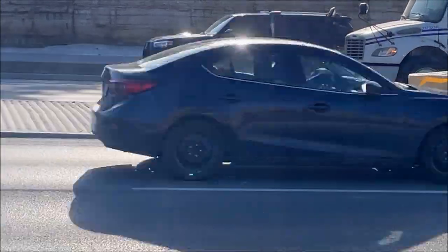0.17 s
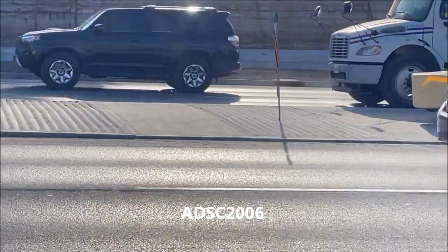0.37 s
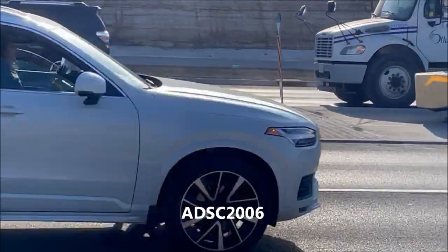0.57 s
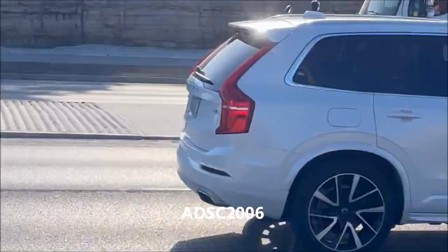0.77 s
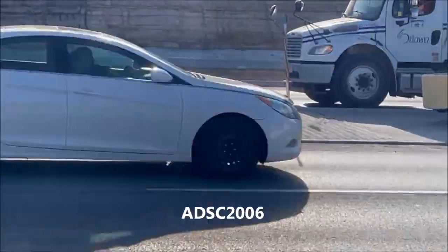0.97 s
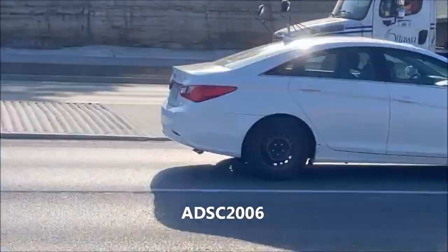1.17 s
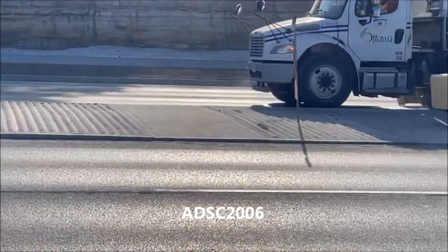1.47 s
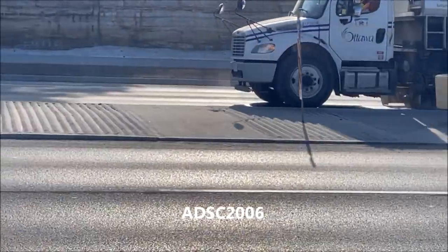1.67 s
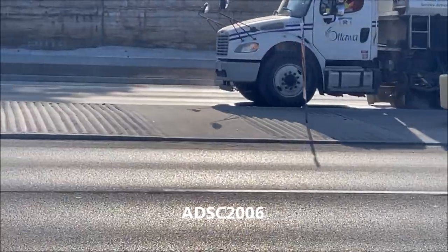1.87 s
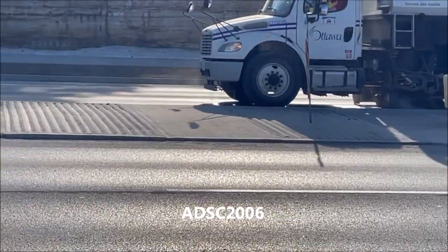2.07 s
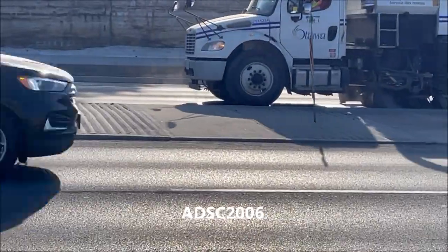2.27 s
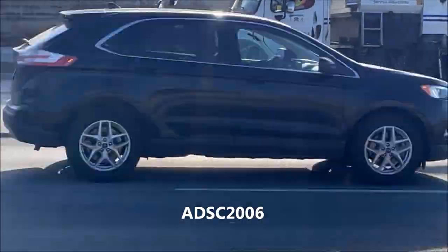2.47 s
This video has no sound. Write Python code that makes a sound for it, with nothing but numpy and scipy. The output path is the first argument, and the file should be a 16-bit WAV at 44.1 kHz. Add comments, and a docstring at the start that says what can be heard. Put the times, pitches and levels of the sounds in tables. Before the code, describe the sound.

Busy road traffic roars past close by, tyres hissing on asphalt over low engine rumble

```python
"""After a brief silence the roar and rumble of a busy multi-lane road cut in, heard from the verge.
Tyres on asphalt give bands of shaped noise from 1 kHz into the treble; hiss swells as cars go by.
Engines give low noise and fuzzy harmonic lines: a slow truck whose pitch dips and then climbs,
and a steady idle. Short Gaussian throbs dot the bass, and a faint hum enters late.
Two microphone ports hear the noise with a likeness and phase lead that depend on frequency."""
import sys
import numpy as np
from scipy import signal
from scipy.io import wavfile
from scipy.ndimage import uniform_filter1d

SR = 44100
rng = np.random.default_rng(int(sys.argv[2]) if len(sys.argv) > 2 else 0)


def int16_out(signal):
    """Quantize to a 16-bit WAV file."""
    q = np.round(np.clip(np.atleast_2d(signal).T, -1, 1) * 32767)
    wavfile.write(sys.argv[1], SR, q.astype(np.int16))


N = 115983

# Tyre roar near 1 kHz: [t/s, level/dB, left minus right/dB], and its spectrum [f/Hz, level/dB]
ROAR_LEVEL = [(.18, -25.5, 0.5), (.35, -24, 0.5), (.65, -22.5, -0.5), (.9, -22.5, -2), (1.15, -23.5, -3),
              (1.33, -24.5, -3), (1.55, -27, -5.5), (1.75, -28.5, -4.5), (1.95, -27, -4.5), (2.25, -28, -2),
              (2.62, -26, -3)]
ROAR_SPECTRUM = [(200, -18.5), (400, -10), (620, -4), (800, -1.5), (960, 0), (1150, -4.5), (1400, -8),
                 (1650, -19), (2600, -34), (5000, -55)]
# Upper tyre band, about 1.7 to 3.2 kHz: [t/s, level/dB], spectrum [f/Hz, level/dB]
WHINE_LEVEL = [(.18, -32.5), (.45, -31.5), (.6, -30.5), (.8, -30), (1.0, -32), (1.25, -33.5), (1.55, -31),
               (1.8, -35), (2.05, -32), (2.3, -35), (2.45, -32.5), (2.62, -35.5)]
WHINE_SPECTRUM = [(1200, -49), (1750, -8), (2000, -12), (2300, -0.5), (2550, 0), (2900, 0), (3250, -7),
                  (4500, -23), (8000, -66)]
# Band reaching the ports almost in antiphase: [t/s, level/dB, left minus right/dB], [f/Hz, level/dB]
WIDE_LEVEL = [(.18, -26.5, -2), (.4, -26.5, -0.5), (.8, -29.5, -4), (1.2, -26, -2.5), (1.5, -26, 1.5),
              (1.8, -26.5, -1), (2.1, -25.5, -1), (2.4, -28, -2.5)]
WIDE_SPECTRUM = [(700, -11.5), (1150, -10), (1400, -4), (1650, 2.5), (1900, -4), (2200, -6), (2600, -19.5),
                 (4000, -74)]
# Tyres of the near-lane cars, near 2 kHz: [t/s, level/dB], spectrum [f/Hz, level/dB]
SING_LEVEL = [(.18, -33.5), (.4, -36), (.55, -28.5), (.66, -32), (.76, -28.5), (.85, -31), (.95, -29),
              (1.02, -30), (1.1, -31.5), (1.35, -38), (1.9, -36.5), (2.15, -34.5), (2.28, -30.5),
              (2.45, -34.5), (2.62, -32)]
SING_SPECTRUM = [(1200, -60), (1700, -9), (1870, 3), (2050, 2), (2250, -1.5), (2450, -29), (3500, -52)]
# Tyres of the first car, near 1.4 kHz: [t/s, level/dB], spectrum [f/Hz, level/dB]
DRONE_LEVEL = [(.18, -35.5), (.3, -32), (.55, -34), (.72, -43), (1.1, -33), (1.6, -36.5), (2.0, -37)]
DRONE_SPECTRUM = [(1000, -40), (1280, 0), (1450, -3), (1600, -15), (2000, -50)]
# Lower treble of the tyres: [t/s, level/dB], spectrum [f/Hz, level/dB]
FIZZ_LEVEL = [(.18, -34), (.5, -33.5), (.79, -34), (.95, -37), (1.2, -36), (1.4, -37.5), (1.85, -36.5),
              (2.07, -34), (2.17, -35), (2.27, -32), (2.48, -35), (2.62, -32.5)]
FIZZ_SPECTRUM = [(1500, -26), (2800, -14.5), (3500, -2), (5000, -5), (6500, -10), (8000, -13), (9500, -20),
                 (13000, -43)]
# Swells of high hiss: [t of the top/s, level/dB, half-width at half amplitude/s]
HISS_SWELLS = [(.27, -51.5, .2), (.46, -61, .12), (.7, -48, 0.17), (1.19, -50, 0.1), (1.6, -49, 0.11),
               (1.76, -51, .15), (2.06, -49, 0.17), (2.27, -41, .14), (2.62, -41, 0.16)]
# Spectra of the hiss and of the sheen at the very top: [f/Hz, level/dB]
HISS_SPECTRUM = [(3000, -43), (6000, 1.5), (8500, 0.5), (10500, -1.5), (12500, -5), (13700, -17),
                 (15000, -28)]
SHEEN_SPECTRUM = [(11000, -30), (13000, -10), (14200, -2), (15300, 3), (16500, -4)]
# Rumble of many engines: [t/s, level/dB], spectrum [f/Hz, level/dB]
RUMBLE_LEVEL = [(.18, -25.5), (.3, -24.5), (.7, -23), (1.0, -24), (1.2, -22), (1.5, -25), (1.75, -22),
                (2.0, -25), (2.3, -23), (2.62, -23.5)]
RUMBLE_SPECTRUM = [(15, -50), (27, -26), (36, -4.5), (48, -4), (65, -0.5), (110, -5), (200, -7),
                   (300, -12.5), (430, -21), (900, -33), (2000, -57)]
# Truck engine: [t/s, firing f/Hz, level/dB], and its orders [multiple of firing f, level/dB]
TRUCK_ENGINE = [(.18, 75.76, -40), (.66, 75.23, -42), (1.3, 74.88, -31), (1.7, 69.96, -33),
                (2.1, 79.66, -29.5), (2.3, 78.9, -33), (2.62, 91.8, -32.5)]
TRUCK_ORDERS = [(1, -2.5), (2, -4), (3, -15)]
# Low throbs that stand out of the rumble: [t/s, f/Hz, peak level/dB]
THROB_EVENTS = [(.24, 57.7, -19.5), (.93, 54, -21), (1.01, 73, -21), (1.11, 220.5, -23),
                (1.16, 116.2, -21.5), (1.4, 95, -22), (1.66, 212.8, -21), (2.15, 83, -17),
                (2.28, 78, -19.5), (2.49, 88.5, -20.5), (2.6, 92.5, -18.5)]
# Microphone ports: likeness [f/Hz, 0 to 1], and phase lead of the left one [f/Hz, rad]
PORT_LIKENESS = [(40, 0.84), (80, 0.83), (180, 0.8), (600, 0.99), (1000, 0.75), (1500, 1), (2300, 1),
                 (2700, 0.86), (5000, 0.96), (7000, 0.76), (8500, 1), (16000, 0.92)]
PORT_LEAD = [(0, 0), (1000, -.1), (1500, .5), (2000, -.2), (2400, .6), (3100, .15), (4000, .55),
             (5000, .05), (5600, .2), (6100, 1.4), (7000, .9), (8500, 3.1), (10600, 6.3), (12800, 9.4),
             (14900, 12.6), (16000, 14.0)]

WIDE_LIKENESS, WIDE_LEAD_RAD = 0.8, 2.98
HISS_FLOOR_DB = -58.5
SHEEN_DB, SHEEN_EXPONENT = -3.5, 1.14  # top level relative to the hiss maximum; deeper swells
TRUCK_WIDTH_HZ = 16  # linewidth
IDLE_HZ, IDLE_DB, IDLE_WIDTH_HZ = 55.3, -37.5, 9.0
THROB_S = 0.022  # from the peak to 1/e of it
HUM_HZ, HUM_DB, HUM_WIDTH_HZ = 316, -39.692, 9.1
HUM_FROM_S, HUM_RISE_S = 1.49, 0.3
START_S, FADE_IN_S = .1693, .0006
LOW_CUT_HZ, BAND_LIMIT_HZ = 37, 15780


def amp(db):
    """Decibel law: 20 dB is a factor of ten in amplitude."""
    return 10 ** (np.asarray(db) / 20)


def evened(x):
    """Normalisation to unit root-mean-square value."""
    return x / np.sqrt(np.mean(x ** 2) + 1e-20)


def read(points, hz):
    """Linear interpolation of a spectrum table on a log-frequency axis."""
    f, value = np.transpose(points)
    return np.interp(np.log(hz + 1), np.log(f + 1), value)


def follow(rows, col=1):
    """Linear interpolation in time: one column of a table at every sample."""
    rows = np.array(rows)
    return np.interp(np.arange(N) / SR, rows[:, 0], rows[:, col])


def placed(rows):
    """Intensity stereo: left and right gains from a table of level and balance."""
    half_balance_db = follow(rows, col=2) / 2
    return amp(follow(rows) + np.array([half_balance_db, -half_balance_db]))


def noise(spectrum, patchy_db, flicker_db, size=1024, ports=None):
    """Spectral synthesis of partly coherent stereo noise, with level patches and a flicker (dB rms)."""
    hop = size // 4
    frames, hz = N // hop + 5, np.fft.rfftfreq(size, 1 / SR)
    a, b, c, d, patches = rng.standard_normal((frames, len(hz), 5)).T

    # Patches drift over bins and frames; the flicker is shared by all bins.
    patches = uniform_filter1d(patches, size=9, axis=0)
    patches = evened(uniform_filter1d(patches, size=12, axis=1))
    flicker = evened(uniform_filter1d(rng.standard_normal(frames), size=4))
    level_db = read(spectrum, hz)[:, None] + patchy_db * patches + flicker_db * flicker

    if ports is None:
        likeness = read(PORT_LIKENESS, hz)[:, None]
        lead = np.interp(hz, *np.transpose(PORT_LEAD))[:, None]
    else:
        likeness, lead = ports
    likeness = np.clip(likeness, 0, 1)

    # The left port hears a phase-shifted share of the right one plus independent noise.
    right = a + 1j * b
    shared = likeness * right * np.exp(1j * lead)
    left = shared + np.sqrt(1 - likeness ** 2) * (c + 1j * d)
    bins = np.array([left, right]) * amp(level_db)
    sound = signal.istft(bins, nperseg=size, noverlap=size - hop)[1]
    return evened(sound[:, :N])


def wavering(hz, width_hz):
    """Narrow-band modulation: slow complex noise with a steady part broadens a spectral line."""
    pole = np.exp(-np.pi * width_hz / SR)
    slow = signal.lfilter([1], [1, -pole], rng.standard_normal((2, N)))
    envelope = evened(slow[0]) + 1j * evened(slow[1]) + 2.04
    carrier = np.exp(2j * np.pi * np.cumsum(hz) / SR)
    return evened((envelope * carrier).real)


def tyres():
    """Broadband friction and impact: tread on asphalt as noise bands, the roar leaning rightward."""
    roar = noise(ROAR_SPECTRUM, 0.75, 0.21) * placed(ROAR_LEVEL)
    whine = noise(WHINE_SPECTRUM, 1.0, 0.96) * amp(follow(WHINE_LEVEL))
    wide_ports = (WIDE_LIKENESS, WIDE_LEAD_RAD)
    wide = noise(WIDE_SPECTRUM, 1.0, 0.35, ports=wide_ports) * placed(WIDE_LEVEL)
    sing = noise(SING_SPECTRUM, 1.0, 0.88) * amp(follow(SING_LEVEL))
    drone = noise(DRONE_SPECTRUM, 1.0, 0.78) * amp(follow(DRONE_LEVEL))
    fizz = noise(FIZZ_SPECTRUM, 0.61, 0.28, size=512) * amp(follow(FIZZ_LEVEL))
    return roar + whine + wide + sing + drone + fizz


def hiss():
    """Addition of powers: bell-shaped swells of high noise, as cars go by, over a low floor."""
    t = np.arange(N) / SR
    power = amp(2 * HISS_FLOOR_DB)
    for top_s, db, width_s in HISS_SWELLS:
        power = power + amp(2 * db) / (1 + ((t - top_s) / width_s) ** 2) ** 2
    level = np.sqrt(power)
    highest = level.max()
    sheen_level = amp(SHEEN_DB) * highest * (level / highest) ** SHEEN_EXPONENT
    body = noise(HISS_SPECTRUM, 1.1, 0.97, size=512) * level
    sheen = noise(SHEEN_SPECTRUM, 1.1, .9, size=512) * sheen_level
    return body + sheen


def engines():
    """Harmonic radiation: truck orders follow the firing rate, with a steady idle and broad rumble."""
    rumble = noise(RUMBLE_SPECTRUM, 1.0, 0.12, size=2048) * amp(follow(RUMBLE_LEVEL))
    firing_hz = follow(TRUCK_ENGINE)
    orders = sum(amp(db) * wavering(k * firing_hz, TRUCK_WIDTH_HZ) for k, db in TRUCK_ORDERS)
    truck = orders * amp(follow(TRUCK_ENGINE, col=2))
    idle = amp(IDLE_DB) * wavering(np.full(N, IDLE_HZ), IDLE_WIDTH_HZ)
    return rumble + truck + idle


def throbs():
    """Gaussian wave packets: short tonal swells in the bass, each with a random phase."""
    t = np.arange(N) / SR
    cycles = rng.random((len(THROB_EVENTS), 1))
    peak_s, hz, db = np.transpose(THROB_EVENTS)[:, :, None]
    envelope = amp(db) * np.exp(-((t - peak_s) / THROB_S) ** 2)
    return (envelope * np.sin(2 * np.pi * (hz * t + cycles))).sum(0)


def hum():
    """Broadened line spectrum: a faint hum at a fixed pitch rises late and then holds."""
    rise = np.clip((np.arange(N) / SR - HUM_FROM_S) / HUM_RISE_S, 0, 1)
    return amp(HUM_DB) * rise * wavering(np.full(N, HUM_HZ), HUM_WIDTH_HZ)


def scene():
    """Linear superposition of all sources."""
    return tyres() + hiss() + engines() + throbs() + hum()


def record(dry):
    """Band-pass reception: the microphone drops the deepest bass, sound cuts in, the top is limited."""
    high_pass = signal.butter(4, LOW_CUT_HZ, "high", fs=SR, output="sos")
    thinned = signal.sosfilt(high_pass, dry)
    opened = thinned * np.clip((np.arange(N) / SR - START_S) / FADE_IN_S, 0, 1)
    low_pass = signal.firwin(511, BAND_LIMIT_HZ, window=("kaiser", 9), fs=SR)
    return signal.oaconvolve(opened, low_pass[None], "same")


dry = scene()
out = record(dry)
int16_out(out)
```